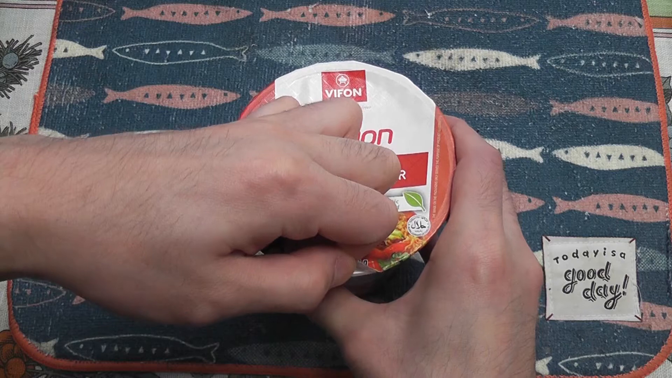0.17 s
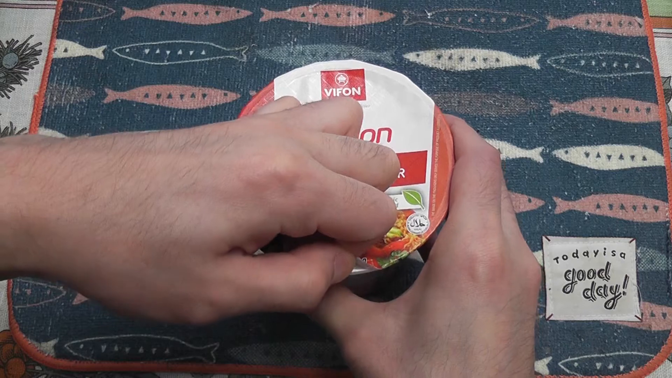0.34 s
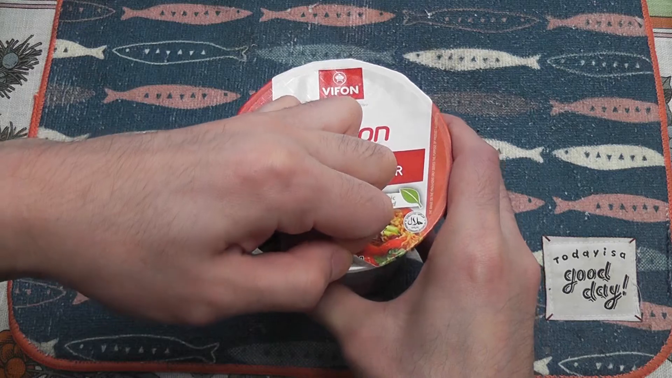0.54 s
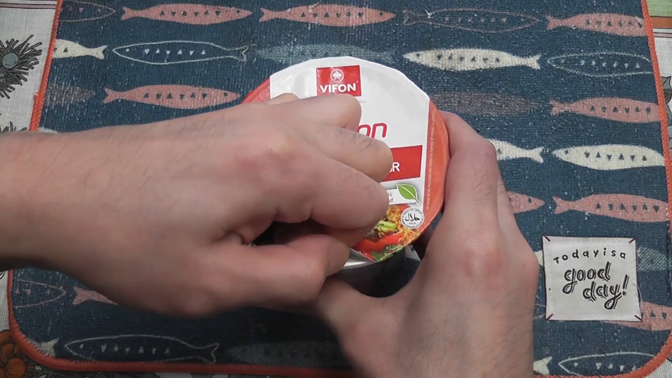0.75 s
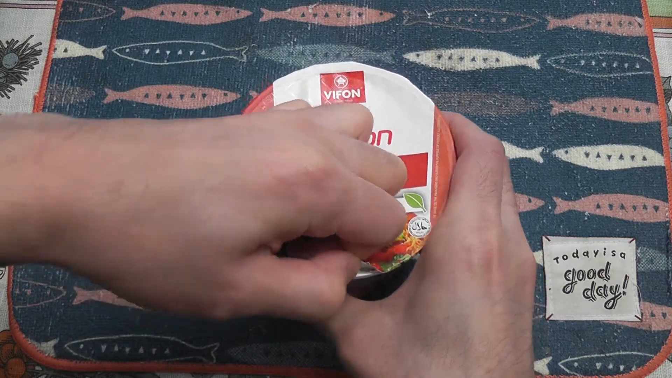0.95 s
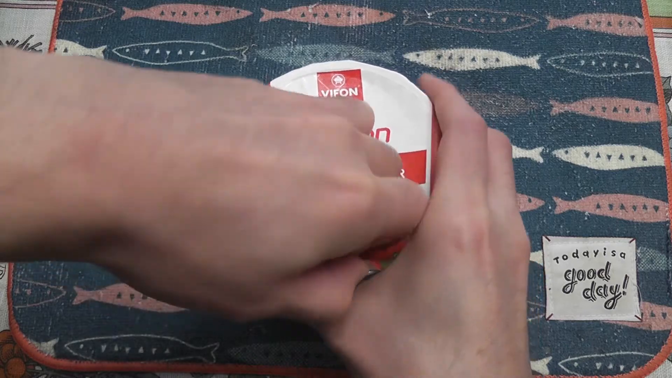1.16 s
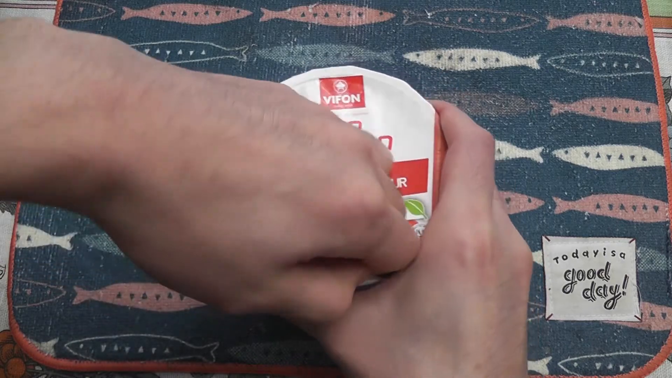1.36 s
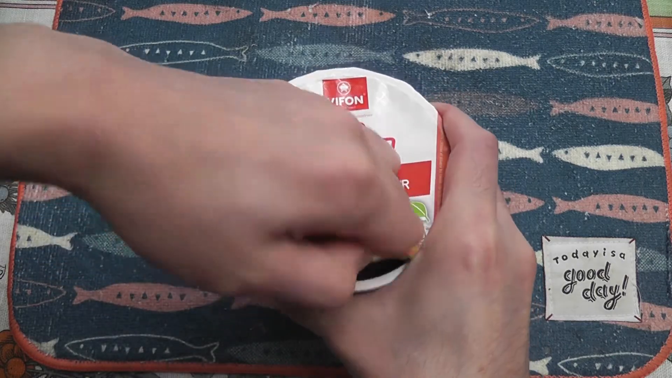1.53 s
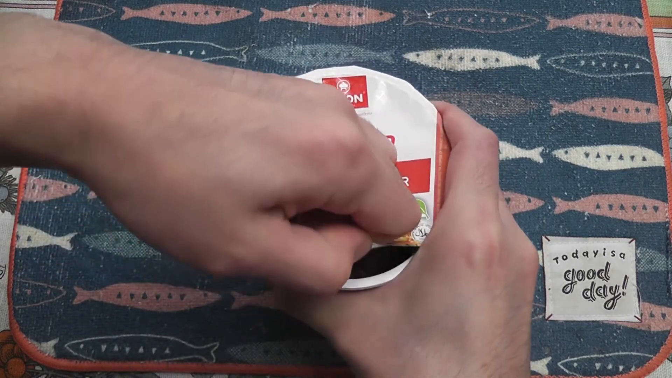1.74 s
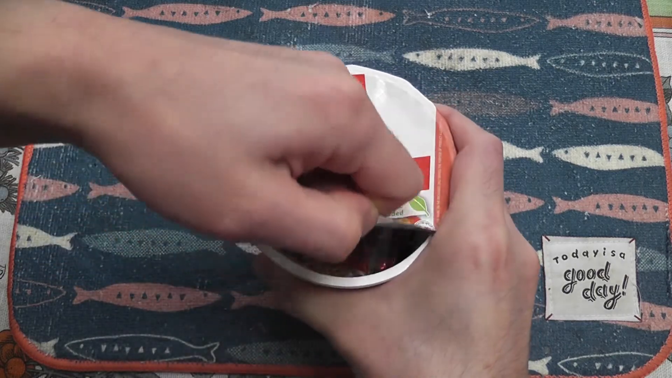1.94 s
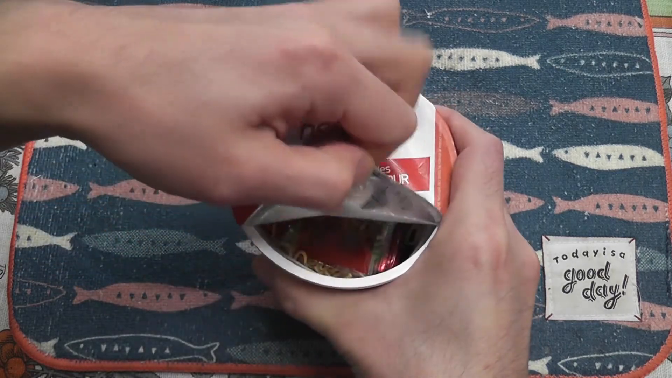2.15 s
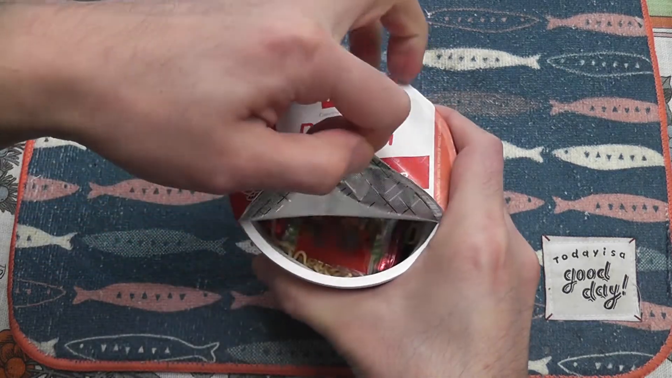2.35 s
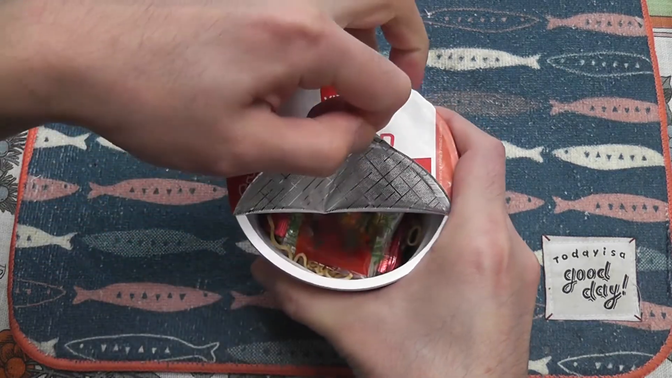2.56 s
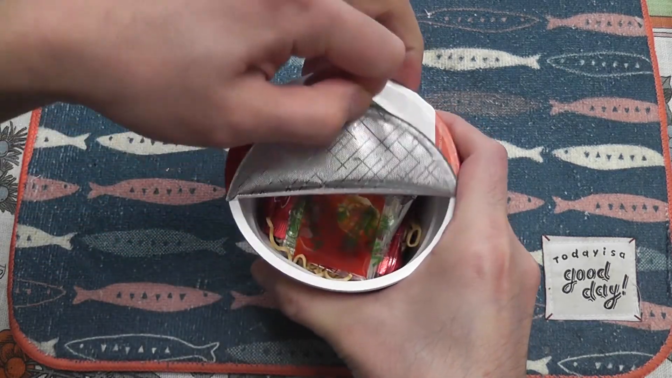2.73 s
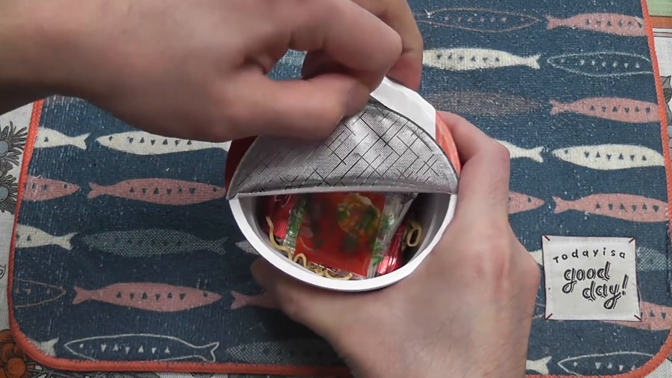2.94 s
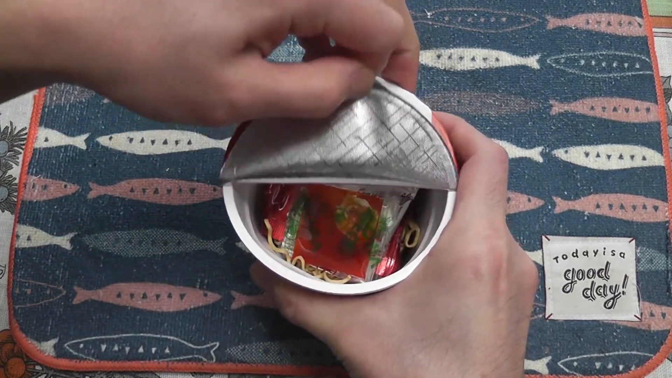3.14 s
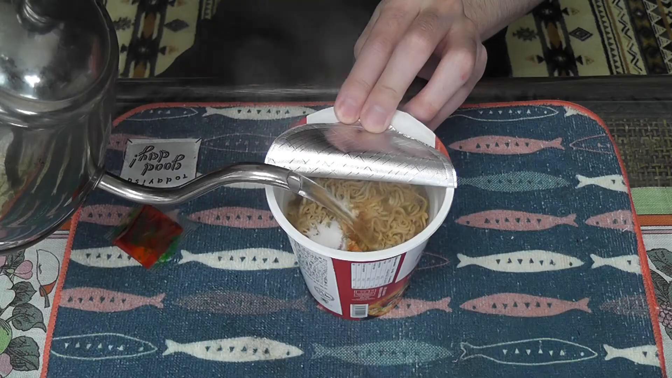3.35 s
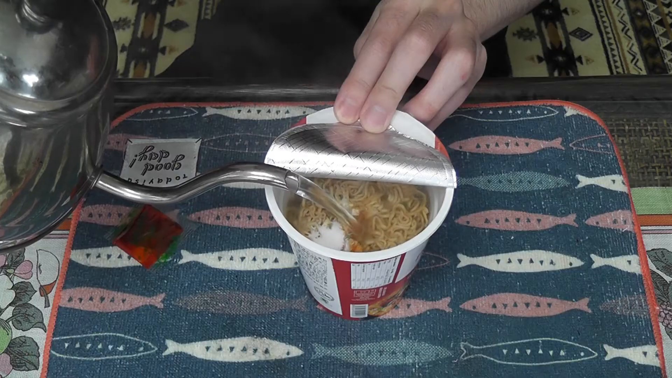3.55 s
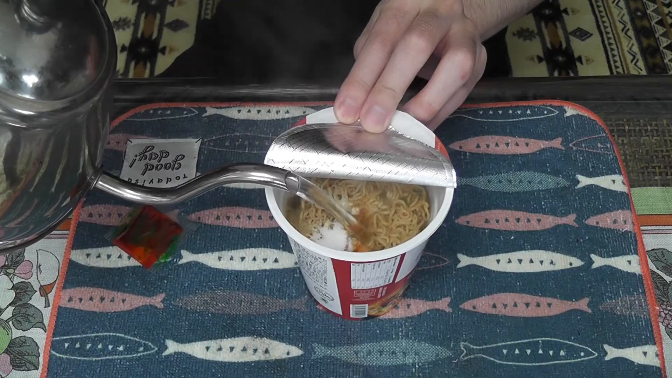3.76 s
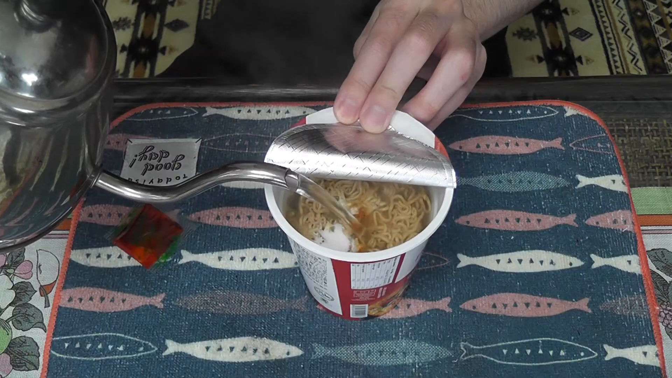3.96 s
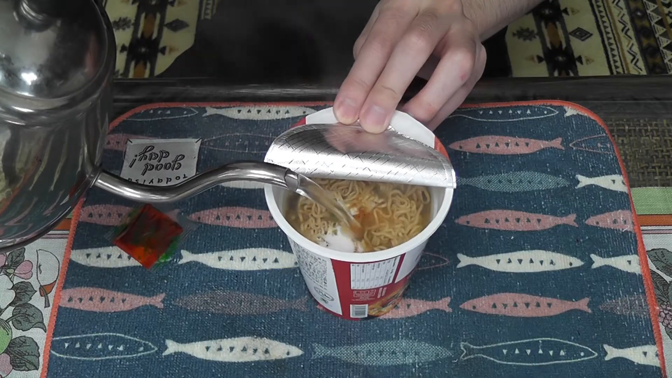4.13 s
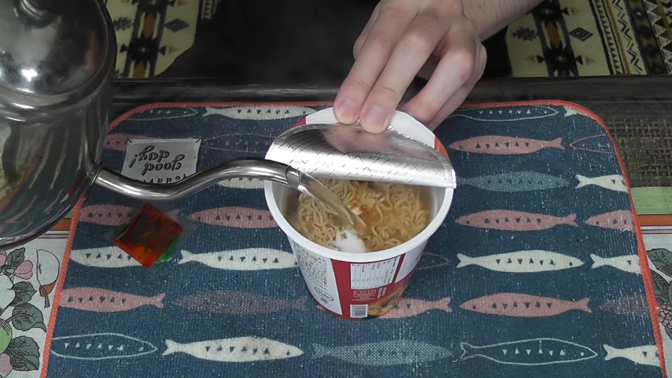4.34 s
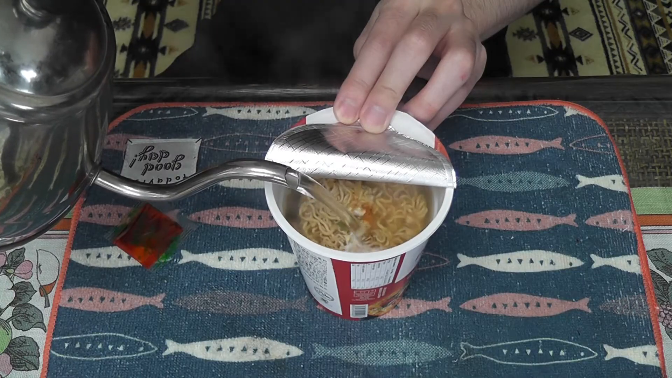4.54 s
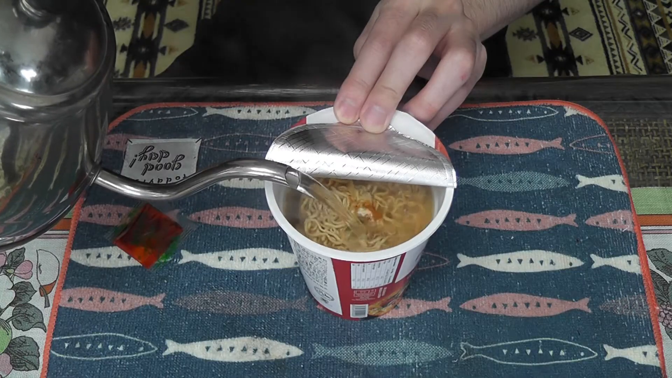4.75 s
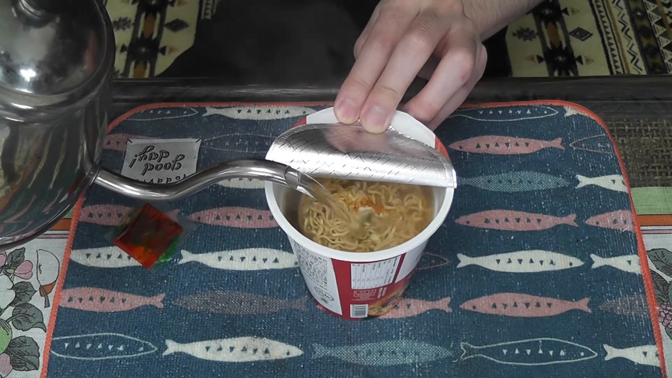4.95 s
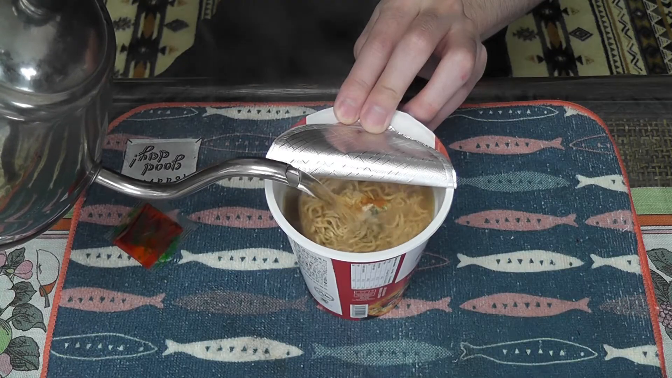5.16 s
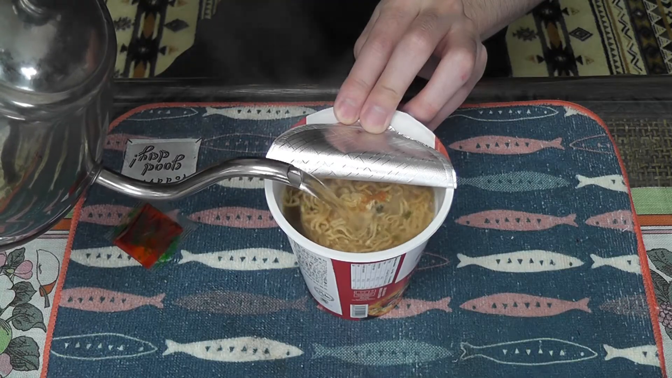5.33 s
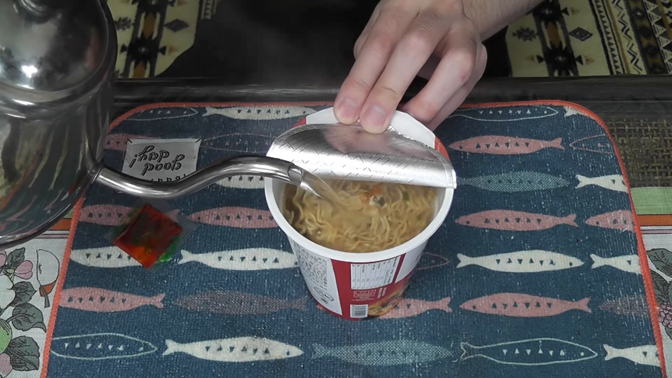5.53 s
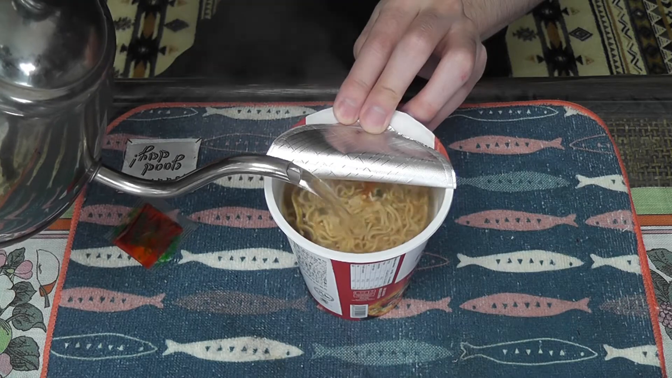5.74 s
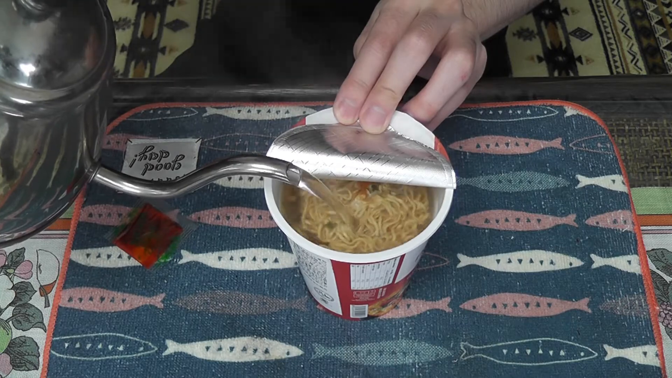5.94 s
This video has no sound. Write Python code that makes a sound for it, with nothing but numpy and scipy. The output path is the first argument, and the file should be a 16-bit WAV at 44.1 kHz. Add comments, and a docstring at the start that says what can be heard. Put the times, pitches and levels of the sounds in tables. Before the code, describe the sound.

Faint nail scratches, sharp snaps and hollow pops as a foil lid tears off a cup, followed by a quiet fizzing trickle of water.

```python
"""In a small, quiet, faintly humming room a fingernail scratches at the foil-and-paper lid of a noodle cup.
The lid snaps and the seal rips open in jerks: smeared cracks and crowds of tiny breaks, coloured by the lid.
Popping walls are short dying tones that ring the hollow cup; the hardest snaps overload the microphones.
Then thin hot water patters and fizzes on the dry noodles: filtered noise with many tiny bubble tones,
and single ticks, spatters and plops that stand out of the stream."""
import sys
import numpy as np
from scipy import signal
from scipy.fft import rfft, irfft, next_fast_len
from scipy.io import wavfile
from scipy.ndimage import map_coordinates

SR = 44100
rng = np.random.default_rng(int(sys.argv[2]) if len(sys.argv) > 2 else 0)


def digitize_waveform(pressure):
    """Quantize a signal to 16-bit integers and store it at the path in sys.argv[1].

    Rows of a 2-D input are taken as channels; values are limited to [-1, 1].
    """
    field = np.atleast_2d(pressure).T
    bounded = np.clip(field, -1, 1)
    quanta = np.round(bounded * 32767).astype(np.int16)
    wavfile.write(sys.argv[1], SR, quanta)


N = 264291  # length in samples
TOP_HZ = 16100  # nothing is kept above this pitch


def amp(db):
    """Turn decibels into a plain factor."""
    return 10 ** (np.asarray(db) / 20)


def unit(x):
    """Scale x to an rms of 1."""
    return x / np.sqrt(np.mean(x ** 2) + 1e-20)


def at_level(x, db, span):
    """Give x as much energy as a sound of this level has in span seconds."""
    return amp(db) * x * np.sqrt(span * SR) / np.linalg.norm(x)


def along(points, hz):
    """Read a curve of (Hz, value) points on a logarithmic pitch axis."""
    f, v = np.transpose(points)
    return np.interp(np.log(hz + 1), np.log(f), v)


def curves(rows):
    """One value per sample for each column after the time."""
    s, *cols = np.transpose(rows)
    return [np.interp(np.arange(N) / SR, s, c) for c in cols]


def add(track, s, x):
    """Mix x into the track at time s in seconds."""
    i = max(round(s * SR), 0)
    track[i:i + len(x)] += x[:max(N - i, 0)]


def filtered(x, response):
    """Multiply the spectrum of x by a response to frequency."""
    n = x.shape[-1]
    m = next_fast_len(n + SR // 4)
    return irfft(rfft(x, m) * response(np.fft.rfftfreq(m, 1 / SR)), m)[..., :n]


def ringing(gain, size=1024):
    """The impulse response that has this gain curve and starts at once, with nothing before the blow."""
    cepstrum = irfft(np.log(gain(np.fft.rfftfreq(size, 1 / SR)) + 1e-6))
    cepstrum[1:size // 2] *= 2
    cepstrum[size // 2 + 1:] = 0
    return irfft(np.exp(rfft(cepstrum)))


def wobble(rate):
    """A smooth random curve, with rate knots a second."""
    knots = rng.standard_normal(int(N * rate / SR) + 4)
    return map_coordinates(knots, [np.arange(N) * rate / SR])


def sparks(n, rate, scatter_db):
    """Random impulses of uneven size, about rate a second, rms 1."""
    sizes = amp(scatter_db * np.clip(rng.standard_normal(n), -2, 2)) * rng.choice([-1, 1], n)
    return unit(sizes * (rng.random(n) < rate / SR))


def burst(t60, first):
    """An impulse of size first, with a flutter of noise that falls 60 dB in t60 seconds."""
    t = np.arange(SR // 20) / SR
    return rng.standard_normal(len(t)) * amp(-60 * t / t60) + first * (t == 0)


def ping(hz, cycles, rise):
    """A dying tone of peak 1 that swells over rise cycles and fades by 60 dB over the given cycles."""
    turns = np.arange(SR // 10) / SR * hz
    x = np.sin(2 * np.pi * turns) * amp(-60 * turns / cycles) * (1 - np.exp(-turns / rise))
    return x / np.abs(x).max()


def modes(table):
    """The tones a body rings at, with new strengths for every blow."""
    t = np.arange(SR // 4) / SR
    out = 0
    for hz, db, t60 in table:
        strength_db = db + rng.normal(0, 4.6)
        out = out + amp(strength_db - 60 * t / t60) * np.sin(2 * np.pi * hz * t) * rng.choice([-1, 1])
    return out


# How far apart the two microphones hear spread-out sound.
# Each row: pitch in Hz, level of the side over the middle in dB.
WIDTH = [(40, 7), (130, -2.5), (300, -3.5), (1000, -3), (4000, -11.5), (8000, -29), (13000, -1)]


def diffuse(pair):
    """Two unrelated signals as two closely spaced microphones hear them."""
    side = filtered(pair[1], lambda hz: amp(along(WIDTH, hz)))
    return np.array([pair[0] + side, pair[0] - side])


# The tone colour of the room noise. Each row: pitch in Hz, relative level in dB.
AMBIENCE_COLOUR = [(25, -25), (60, -8.5), (95, -8), (130, -2.5), (220, 4), (300, 0.5), (390, -4),
                   (480, -2.5), (600, -5.5), (1000, -9), (2200, -17), (3000, -15), (6000, -23.5),
                   (16000, -37)]
# How loud the room noise is. Each row: time in seconds, level in dB.
BACKGROUND = [(0.085, -110), (0.092, -54.5), (0.6, -57), (0.8, -56.5), (3.05, -58), (3.35, -57.5),
              (6, -56.5)]
# The appliance hum, which follows the room noise up and down.
# Each row: pitch in Hz, level at the end in dB.
HUM = [(118.4, -69.5), (161.5, -68.5), (301.5, -66.5), (484.5, -67)]


def ambience():
    """Dull room noise with a faint appliance hum made of steady sines."""
    noise = rng.standard_normal((2, N))
    air = unit(filtered(noise, lambda hz: amp(along(AMBIENCE_COLOUR, hz))))
    t = np.arange(N) / SR
    level_db = curves(BACKGROUND)[0]
    hum = 0
    for hz, db in HUM:
        hum = hum + amp(db) * np.sqrt(2) * np.sin(2 * np.pi * (hz * t + rng.random()))
    return amp(level_db) * diffuse(air) + amp(level_db - level_db[-1]) * hum


# How long the room's echo lasts. Each row: pitch in Hz, time to fall 60 dB in seconds.
ROOM = [(100, 0.17), (450, 0.38), (1500, 0.28), (5000, 0.26), (15000, 0.17)]
# How much the room throws back. Each row: pitch in Hz, reflected level in dB.
ECHO = [(60, -20.5), (250, -11), (500, -6.5), (1500, -9.5), (3000, -10), (4500, -12), (9000, -16.5),
        (16000, -15)]


def room(x, count=14):
    """The walls' answer as fading noise, drawn anew for each part as hands and lid move."""
    out = np.zeros((2, N + SR))
    for part in np.array_split(np.arange(N), count):
        hz, t, z = signal.stft(rng.standard_normal((2, SR // 2)), SR, nperseg=256)
        t60 = along(ROOM, hz)[:, None]
        same_energy = np.sqrt(2 * np.log(1000) / (t60 * SR))  # for long and short tails alike
        fade = amp(along(ECHO, hz)[:, None] - 60 * t / t60) * same_energy
        build_up = 1 - np.exp(-t / 0.0017)
        tail = signal.istft(z * fade * build_up, SR, nperseg=256)[1]
        wet = signal.fftconvolve(x[part][None], tail, axes=1)
        out[:, part[0]:part[0] + wet.shape[1]] += wet
    return diffuse(out[:, :N])


# The lid's own tone colour. Each row: pitch in Hz, gain in dB.
LID = [(60, -28.5), (300, 5.5), (650, 5.5), (1050, 4), (1500, 6), (1900, 1), (2400, -2), (3300, 1.5),
       (5100, 1.5), (7300, 4), (10500, 5.5), (14000, 4), (16000, -9)]


def lid(push, centre_hz, octaves):
    """A push heard through the lid; the size of the moving patch sets the centre pitch."""
    def gain(hz):
        patch = (1 + (np.log2((hz + 1) / centre_hz) / octaves) ** 2) ** -4
        return patch * amp(along(LID, hz))
    return signal.fftconvolve(push, ringing(gain))


# The nail catches on the tab. Each row: start in seconds, level of the first slip in dB.
PICKS = [(0.102, -43.5), (0.207, -46.5), (0.281, -45.5), (0.3641, -43.5), (0.427, -46.5), (0.499, -41),
         (0.5455, -45.5), (0.668, -51.5)]
SLIP_GAP_S, SLIP_LOSS_DB = 0.01, 4  # rough gap between slips of a pick; each is this much weaker
PICK_HZ, SLIP_DULLING = 1300, 0.78  # centre of the first slip; each next pitch over the last
RIM_DB = 0.5  # peak of the rim's answer over the slip's level
# Fingers slide on the lid or the foil brushes the rim.
# Each row: start in seconds, end in seconds, level in dB before the grain wobbles.
STROKES = [(1.074, 1.109, -50), (1.158, 1.344, -49.5), (1.375, 1.49, -50.5), (2.05, 2.304, -60.5),
           (2.302, 2.376, -54), (2.42, 2.526, -55.5), (2.709, 2.797, -46), (3.21, 3.264, -58)]
STROKE_ATTACK_S, STROKE_RELEASE_S = 0.042, 0.047


def fingers(count=3):
    """The nail skids on the tab in weakening slips; skin sliding on printed paper is a stream of sparks."""
    out = np.zeros(N)
    for start, first_db in PICKS:
        for k in range(count):
            s = start + SLIP_GAP_S * k * rng.uniform(0.76, 1.6)
            db = first_db - SLIP_LOSS_DB * k
            slip = lid(burst(t60=0.016, first=0.67), PICK_HZ * SLIP_DULLING ** k, octaves=3.01)
            add(out, s, at_level(slip, db, span=0.0057))
            add(out, s, amp(db + RIM_DB) * ping(hz=620, cycles=21, rise=.8))  # the rim answers under the nail
    t = np.arange(N) / SR
    pressure = 0
    for start, end, db in STROKES:
        corners = [start - STROKE_ATTACK_S, start, end, end + STROKE_RELEASE_S]
        pressure = pressure + amp(db) * np.interp(t, corners, [0, 1, 1, 0]) ** 2
    grain = sparks(N, rate=5500, scatter_db=1.5)
    rub = lid(grain, centre_hz=1800, octaves=4.5)[:N]
    return out + pressure * amp(3.2 * wobble(rate=120)) * unit(rub)


# How freely the peeled flap stands; it is pinned back against the rim at the end.
# Each row: time in seconds, freedom from 0 to 1.
FREEDOM = [(2.0, 0.11), (2.2, 0.46), (2.4, 1), (2.85, 0.74), (3.1, 0.18)]


def freedom(s):
    """How freely the flap stands at time s."""
    return np.clip(np.interp(s, *np.transpose(FREEDOM)), 0, 1)


# The cup and the air in it, with the lid free.
# Each row: pitch in Hz, typical relative level in dB, time to fall 60 dB in seconds.
CUP = [(230.5, -3, 0.15), (275.3, -1.5, 0.18), (352, -1.5, 0.058), (444.7, -2.5, 0.21), (529, -31, 0.82),
       (589, 1.5, 0.059), (643, 2.5, 0.0423)]
SEAL_STIFFENING = 1.14  # a fully taut lid raises the wall's lowest modes by this factor
AIR_HZ, AIR_CYCLES, AIR_DB = 469.5, 45, -5.5  # air in the open cup: pitch, life, peak over the tug


def cup(s, db, span):
    """The cup's answer to a tug: as the lid comes free the wall slackens and the air inside starts to ring."""
    stiffening = SEAL_STIFFENING ** (1 - freedom(s))
    wall = [(hz * stiffening if hz < 300 else hz, level, t60) for hz, level, t60 in CUP]
    out = at_level(modes(wall), db, span)
    add(out, 0, freedom(s) * amp(db + AIR_DB) * ping(AIR_HZ, AIR_CYCLES, rise=1))
    return out


def crack(spread, size=2048):
    """An impulse smeared by bending waves: treble arrives first, and each band takes its own path."""
    hz = np.fft.rfftfreq(size, 1 / SR)
    paths = map_coordinates(rng.standard_normal(size // 16), [hz / 330]) ** 2
    delay = 0.000405 * np.sqrt(1500 / (hz + 300)) + spread * paths  # in seconds
    arrivals = irfft(np.exp(-2j * np.pi * np.cumsum(delay) * SR / size))
    fade = np.linspace(1, 0, size) ** 2  # from 1 at the first sample to 0 at the last
    return unit(arrivals * fade)


def snap(db, hz, octaves):
    """One crack in the lid and the foil's flutter after it."""
    push = crack(spread=0.0004567)
    push = push + 1.27 * unit(burst(t60=0.016, first=0)[:len(push)])
    return at_level(lid(push, hz, octaves), db, span=0.003)


# The lid buckles or the seal lets go.
# Each row: start in seconds, level in dB, centre pitch in Hz, width in octaves.
SNAPS = [(0.7134, -19, 8900, 9.1), (0.938, -47.5, 2320, 3.6), (0.9657, -30.5, 2260, 2.7),
         (1.0306, -42.5, 4500, 5.8), (1.0762, -43, 2700, 6.1), (1.1032, -34.5, 1610, 3.8),
         (1.155, -38, 2000, 8.2), (1.287, -39, 2000, 9), (1.417, -30.5, 820, 2.4),
         (1.4262, -24.5, 4250, 6.8), (1.4774, -21.5, 2376, 1.5), (1.563, -33.5, 700, 5.2),
         (1.5768, -15.5, 6060, 5.5), (1.6094, -22, 3656, 2), (1.6203, -28.5, 2520, 1.9),
         (1.6283, -29, 2010, 3.2), (1.7133, -34, 2310, 3.4), (1.726, -19, 2960, 3.2),
         (1.8023, -36, 880, 4.6), (1.8292, -16.5, 1034, 4.9), (1.8356, -18, 3420, 3.2),
         (1.842, -26, 1720, 3.3), (1.8653, -21.5, 2400, 4.5), (1.8816, -21, 1580, 6.5),
         (1.8861, -22.5, 2200, 3.3), (1.899, -21, 1000, 5.3), (1.906, -21.5, 2570, 3.5),
         (1.928, -23.5, 1180, 6), (1.934, -21, 4170, 1.8), (1.952, -23.5, 2560, 3.9),
         (1.9618, -22.5, 1580, 6.2), (2.0036, -20.5, 2420, 5), (2.013, -22.5, 3000, 2.3),
         (2.0831, -24.5, 1850, 4.5), (2.092, -21.5, 2390, 2.2), (2.2038, -23, 1520, 4.4),
         (2.2165, -26.5, 2300, 4), (2.2496, -33, 2000, 4.1), (2.256, -29.5, 2430, 18),
         (2.3264, -26, 1230, 2.9), (2.4709, -18.5, 2305, 4.3), (2.5074, -21, 1490, 12),
         (2.7055, -29.5, 927, 7.1), (2.725, -18, 2095, 6.9), (2.7609, -30, 3150, 4.4),
         (2.7753, -27, 1290, 6.2), (2.7826, -31, 3400, 3.6), (3.131, -34, 750, 2.6),
         (3.1396, -36.5, 2700, 4.4), (3.1584, -19, 3170, 5.2), (3.18, -21.5, 2580, 11),
         (3.202, -20, 3240, 22), (3.2673, -42.5, 3920, 3.7)]
# The tones of the loose flap.
# Each row: pitch in Hz, typical relative level in dB, time to fall 60 dB in seconds.
FLAP = [(1491, -6.5, 0.027), (3000, -11, 0.015), (3490, -0.5, 0.0075)]
FLAP_DB = -2  # a fully free flap's level over the snap's
TUG_DB, TUG_DB_PER_OCTAVE, TUG_HZ = -7.5, -14, 2000  # cup's share of a snap; patches above this pitch tug less


def snaps():
    """Each snap cracks in the lid, tugs at the cup and rings the flap as far as that is free."""
    out = np.zeros(N)
    for s, db, hz, octaves in SNAPS:
        tug_db = TUG_DB + TUG_DB_PER_OCTAVE * max(np.log2(hz / TUG_HZ), 0)
        add(out, s, snap(db, hz, octaves))
        add(out, s, cup(s, db + tug_db, span=0.0077))
        add(out, s, freedom(s) * at_level(modes(FLAP), db + FLAP_DB, span=0.0045))
    return out


OVERLOAD_DB, OVERLOAD_SLOPE = -19, 4.4  # snaps this loud jolt fully; dB of jolt lost per dB below
THUMP_COMMON_DB, THUMP_OPPOSED_DB = -21, -19.5  # peak of a full jolt, alike and opposite in the two microphones


def thumps():
    """Under the hardest snaps an overloaded microphone swings out once and creeps back."""
    mid, side = np.zeros((2, N))
    t = np.arange(SR // 25) / SR
    u = t / 0.002
    swing = (1 - u) * np.exp(-u) * (1 - np.exp(-t / 0.00011))
    swing /= swing.max()
    for s, db, *_ in SNAPS:
        jolt = amp(OVERLOAD_SLOPE * min(db - OVERLOAD_DB, 0)) * swing
        add(mid, s + 0.00078, amp(THUMP_COMMON_DB) * jolt)
        add(side, s + 0.001, amp(THUMP_OPPOSED_DB) * jolt * rng.choice([-1, 1]))
    return np.array([mid + side, mid - side])


# The cup wall or the stiff lid pops over. Each row: start in seconds, peak in dB, pitch in Hz.
KNOCKS = [(0.9659, -19.5, 2100), (1.156, -47, 232), (1.4381, -17, 441), (1.439, -23.5, 253),
          (1.4772, -7, 3450), (1.4782, -11, 728), (2.083, -20, 482), (2.0912, -8.5, 1800),
          (2.1425, -22.5, 249.4), (2.207, -31.5, 236), (2.331, -23.5, 259), (2.477, -19.5, 251),
          (2.7, -25.5, 251), (2.787, -19, 252), (2.788, -17, 545), (2.833, -19.5, 435), (3.158, -16, 3010),
          (3.179, -16, 3000)]
# How long a pop lasts, longest near the cup's air resonance. Each row: pitch in Hz, life in cycles.
KNOCK_LIFE = [(250, 7.4), (450, 14.4), (700, 3.6), (3300, 4.7)]


def knocks():
    """The wall pops over in a few cycles and leaves the cup ringing."""
    out = np.zeros(N)
    for s, db, hz in KNOCKS:
        add(out, s, amp(db) * ping(hz, along(KNOCK_LIFE, hz), rise=0.97))
        coupling_db = along([(500, -4.5), (900, -34), (3000, -27)], hz)  # only slow pops move the whole cup
        add(out, s, cup(s, db + coupling_db, span=0.0049))
    return out


# Runs of tearing glue and creasing foil.
# Each row: start in seconds, end in seconds, level in dB before the run wobbles, centre pitch in Hz.
RIPS = [(1.089, 1.115, -38.5, 2210), (1.571, 1.61, -24.5, 2320), (1.603, 1.637, -26, 2040),
        (1.833, 1.958, -41, 1560), (2.004, 2.027, -32.5, 2680), (2.311, 2.342, -45.5, 1300),
        (2.432, 2.537, -44.5, 1100), (2.727, 2.798, -41, 1700), (2.792, 2.843, -49, 900),
        (3.125, 3.151, -45.5, 1493), (3.152, 3.222, -42.5, 1610)]
RIP_FADE_DB = 3  # a run loses this much as the tension eases


def rips():
    """Glue and fibres give way in clumps of tiny breaks: sparks and noise through the lid."""
    out = np.zeros(N)
    for start, end, db, hz in RIPS:
        n = max(round((end - start) * SR), SR // 200)
        breaks = (sparks(N, rate=1100, scatter_db=1.5) + 0.81 * rng.standard_normal(N))[:n]
        swell = signal.windows.tukey(n, 1 / 4) * amp(-RIP_FADE_DB * np.arange(n) / n)
        add(out, start, at_level(lid(breaks * swell, hz, octaves=4.5), db, span=n / SR))
    return out * amp(2.4 * wobble(rate=140))


CRINKLES_PER_S = 78
CRINKLE_DB, CRINKLE_SCATTER_DB = 1, -2  # level over the run's; how far it strays (the sign does not matter)
CRINKLE_SCATTER_OCTAVES = 0.67  # their centre pitch strays up to this far from the run's


def crinkles():
    """Small snaps of uneven timing, size and colour along the runs of tearing."""
    out = np.zeros(N)
    gap = 1 / CRINKLES_PER_S
    for start, end, run_db, run_hz in RIPS:
        for s in np.arange(start, end - gap, gap):
            size, pitch = rng.uniform(-1, 1, 2)
            db = run_db + CRINKLE_DB + CRINKLE_SCATTER_DB * size
            hz = run_hz * 2 ** (CRINKLE_SCATTER_OCTAVES * pitch)
            add(out, s + rng.random() * gap, snap(db, hz, octaves=3.3))
    return out


def bubbles(n, rate, hz, octaves, cycles, scatter_db):
    """Tiny bubbles at random moments, each a short ping at its own pitch; rms 1."""
    draws = rng.random((max(int(rate * n / SR), 1), 4))
    start = (draws[:, :1] * n).astype(int)
    pitch = np.minimum(hz * 2 ** (octaves * (draws[:, 1:2] - draws[:, 2:3])), TOP_HZ)
    size = amp(-scatter_db * np.log(np.maximum(draws[:, 3:], .01)))  # many small, a few large
    k = np.arange(SR // 100)
    turns = pitch * k / SR
    pings = size * np.sin(2 * np.pi * turns) * amp(-60 * turns / cycles) * (1 - np.exp(-turns))
    return unit(np.bincount((start + k).ravel(), pings.ravel(), n))


POUR_START = 3.3  # seconds
# How loud the water is before it wavers. Each row: time in seconds, splash level in dB, fizz level in dB.
POUR = [(3.32, -64.5, -61), (4.05, -62, -60.5), (4.44, -61.5, -57), (4.88, -60.5, -56.5),
        (5.26, -60.5, -56.5), (5.71, -57.5, -53.5), (5.99, -56, -57)]
# The tone colour of the splash in the cup's hollow. Each row: pitch in Hz, gain in dB.
SPLASH = [(300, -63), (780, -13), (1130, 0), (1450, -4), (1750, -15), (2200, -35), (3000, -34)]
# The tone colour of the fizz on the noodles. Each row: pitch in Hz, gain in dB.
FIZZ = [(1200, -10.5), (2300, -17.5), (2850, 6.5), (3600, -2.5), (4400, 0.5), (5300, -7), (5900, -0.5),
        (6500, -7), (7500, 1.5), (9400, 7.5), (11500, 1.5), (13700, 3), (16000, -11)]


def water():
    """The stream splashes in the cup's hollow and fizzes on the noodles: bubbles and noise, filtered."""
    def through(drops, spectrum):
        return unit(filtered(drops[:N], lambda hz: amp(along(spectrum, hz))))
    splash_db, fizz_db = curves(POUR)
    pouring = np.clip((np.arange(N) / SR - POUR_START) / .03 + 1, 0, 1)
    low = bubbles(N, rate=200, hz=1410, octaves=0.75, cycles=3.9, scatter_db=5)[:N]
    splash = through(low + 2.3 * rng.standard_normal(N), SPLASH)
    high = bubbles(N, rate=800, hz=7020, octaves=1.98, cycles=2.9, scatter_db=10.5)[:N]
    fizz = through(high + 0.98 * rng.standard_normal(N), FIZZ)
    flow = wobble(rate=11)  # the thin stream wavers
    return pouring * (amp(splash_db + 0.44 * flow) * splash + amp(fizz_db + 0.76 * flow) * fizz)


CROWDING = 1.9  # drops come more often as water collects: their count grows with this power of time
DROP_SCATTER_DB = 4.5  # spread in size of the chance drops


def stray_drops(level_db, hz, octaves, count):
    """Rows (s, dB, Hz) of chance drops that follow a level curve and crowd as the cup fills."""
    share = ((np.arange(count) + rng.random(count)) / count) ** (1 / CROWDING)
    s = POUR_START + share * (N / SR - POUR_START)
    size, pitch = np.clip(rng.standard_normal((count, 2)), -2, 2).T
    db = np.interp(s * SR, np.arange(N), level_db) + DROP_SCATTER_DB * size
    return list(zip(s, db, np.minimum(hz * 2 ** (octaves * pitch), TOP_HZ)))


# The clearest droplets and tiny bubbles bursting. Each row: start in seconds, level in dB, pitch in Hz.
TICKS = [(3.5, -43.5, 2830), (3.617, -36, 4000), (3.9219, -43, 5600), (4.0175, -40, 11000),
         (4.1446, -42, 13800), (4.3019, -36, 9530), (4.522, -37, 8230), (4.5876, -38, 3140),
         (5.3017, -42, 5700), (5.38, -40, 10470), (5.6075, -39, 8200), (5.6368, -37, 9320)]
TICK_OCTAVES = 2.16  # width of a tick's spectrum
FAINT_TICK_DB, FAINT_TICK_HZ = 8.5, 9500  # the many other ticks: level over the fizz, typical pitch
SPATTER_DB, SPATTER_HZ = -3.5, 6060  # short spatters of the stream: level over the fizz, typical pitch
# Trapped air plops in hollows between the noodles. Each row: start in seconds, peak in dB.
PLOPS = [(3.476, -39.5), (4.26, -33.5), (4.2672, -33), (4.2736, -32), (4.285, -35), (4.374, -39),
         (4.452, -35.5), (4.481, -35), (4.561, -35.5), (4.615, -35), (5.303, -34.5), (5.734, -38),
         (5.816, -37.5), (5.97, -32.5)]
# The clear plops rise as the hollows shrink in the filling cup. Each row: time in seconds, pitch in Hz.
PLOP_HZ = [(3.4, 1028), (5.2, 1230), (5.8, 1423)]
FAINT_PLOP_DB = 13  # the many other plops: peak over the splash
# The softening noodles shift against the cup. Each row: start in seconds, level in dB.
SHIFTS = [(4.458, -45), (4.563, -49), (5.054, -41.5)]


def drops():
    """Drops stand out as bursts (ticks), bubble runs (spatters) and pings (plops); shifting noodles ring the cup."""
    out = np.zeros(N)
    splash_db, fizz_db = curves(POUR)
    faint_ticks = stray_drops(fizz_db + FAINT_TICK_DB, FAINT_TICK_HZ, octaves=0.25, count=13)
    for s, db, hz in TICKS + faint_ticks:
        def gain(f):
            band = (1 + (np.log2((f + 1) / hz) / TICK_OCTAVES) ** 2) ** -3
            return band * amp(along(FIZZ, f))
        tick = np.convolve(burst(t60=0.0098, first=3.3), ringing(gain))
        add(out, s, at_level(tick, db, span=0.002))
    for s, db, hz in stray_drops(fizz_db + SPATTER_DB, SPATTER_HZ, octaves=0.46, count=16):
        spatter = bubbles(SR // 36, rate=700, hz=hz, octaves=0.69, cycles=7.4, scatter_db=1.0)
        add(out, s, amp(db) * spatter)
    clear_plops = [(s, db, np.interp(s, *np.transpose(PLOP_HZ))) for s, db in PLOPS]
    faint_plops = stray_drops(splash_db + FAINT_PLOP_DB, hz=1290, octaves=0.16, count=24)
    for s, db, hz in clear_plops + faint_plops:
        add(out, s, amp(db) * ping(hz, cycles=8.2, rise=0.77))
    for s, db in SHIFTS:
        add(out, s, at_level(modes(CUP), db, span=0.0038))
    return out


def scene():
    """Lid and water close to the microphones, in a small room."""
    handling = fingers() + snaps() + knocks() + rips() + crinkles()
    # a small cup radiates little bass
    handling = filtered(handling, lambda hz: (1j * hz / (60 + 1j * hz)) ** 2)
    direct = handling + water() + drops()
    # the sound leaves the cup in changing directions; the two microphones differ mostly in the top octave
    side_db = [(300, -40), (1200, -16.0), (4500, -23.5), (8000, -26.5), (13500, -4)]
    side = filtered(direct, lambda hz: amp(along(side_db, hz)))
    quadrature = filtered(side, lambda hz: 1j * np.sign(hz))  # the same, a quarter cycle shifted
    side = 0.8 * wobble(rate=40) * side + 0.36 * wobble(rate=25) * quadrature
    return np.array([direct + side, direct - side]) + room(direct) + ambience() + thumps()


def record(dry):
    """Keep nothing above the band limit."""
    return filtered(dry, lambda hz: hz < TOP_HZ)


dry = scene()
out = record(dry)
digitize_waveform(out)
```